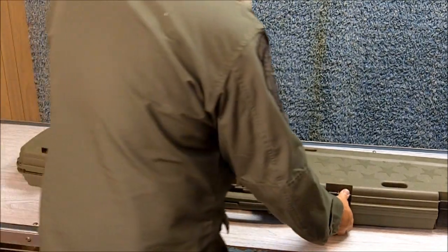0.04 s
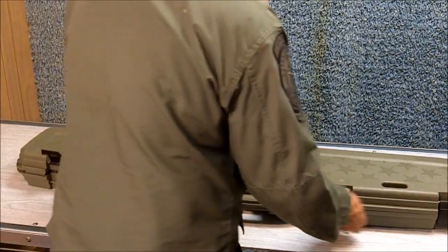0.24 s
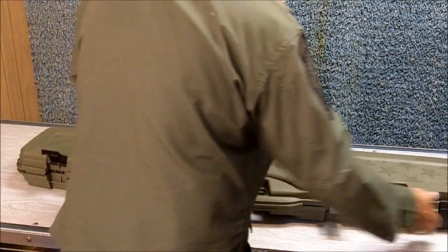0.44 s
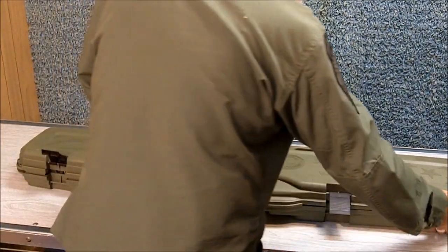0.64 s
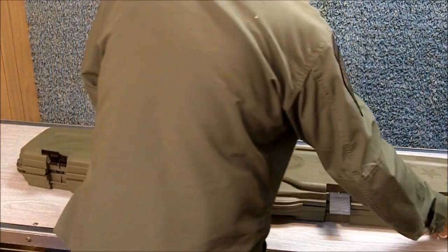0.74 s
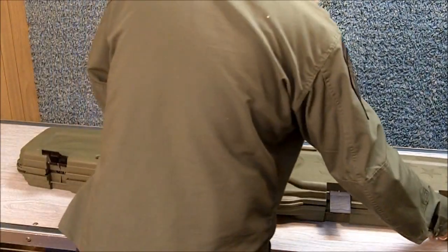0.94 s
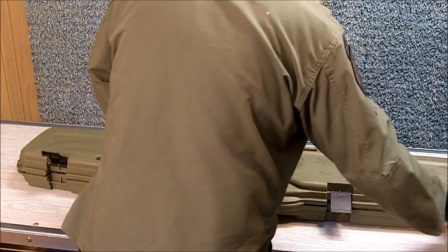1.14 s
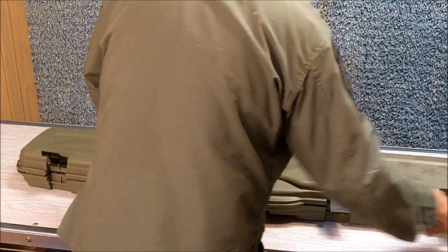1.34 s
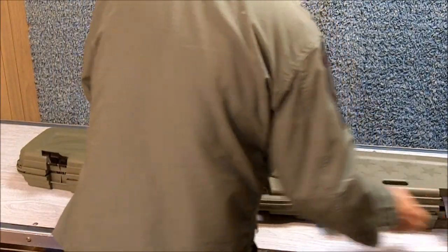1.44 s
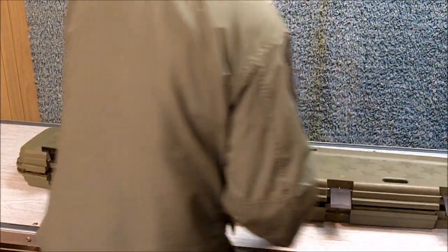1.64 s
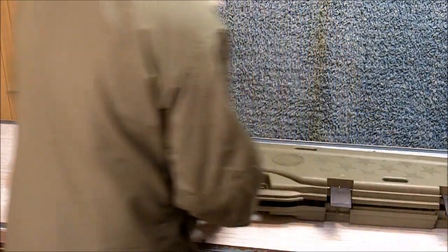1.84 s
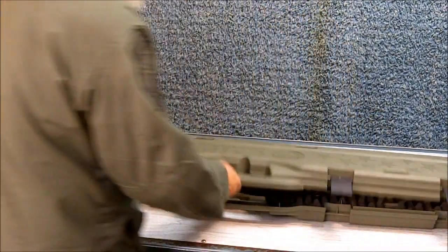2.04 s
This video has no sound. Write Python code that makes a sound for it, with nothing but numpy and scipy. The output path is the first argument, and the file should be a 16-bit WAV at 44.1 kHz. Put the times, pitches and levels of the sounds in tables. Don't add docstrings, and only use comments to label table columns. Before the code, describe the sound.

Close up in a small soft-walled room, a plastic case latch clacks open with a deep hollow knock, then a brighter second one snaps; light hand bumps, ticks and cloth rubbing surround them.

```python
import sys
import numpy as np
from scipy import signal
from scipy.fft import rfft, irfft, next_fast_len
from scipy.io import wavfile
from scipy.ndimage import map_coordinates

SR = 44100
rng = np.random.default_rng(int(sys.argv[2]) if len(sys.argv) > 2 else 0)


def wav_out(sig):
    wavfile.write(sys.argv[1], SR, np.round(np.clip(np.atleast_2d(sig).T, -1, 1) * 32767).astype(np.int16))


def voltage_ratio(decibels):
    exponent = np.asarray(decibels, float) / 20
    return 10 ** exponent


N = 92610
LOW_CUT_HZ = 79


def unit(x):
    return x / np.sqrt(np.mean(x ** 2) + 1e-20)


def along(points, hz):
    f, value = np.transpose(points)
    return np.interp(np.log(hz + 1), np.log(f + 1), value)


def coloured(x, spectrum):
    n = x.shape[-1]
    size = next_fast_len(n + SR // 5)
    gain = voltage_ratio(along(spectrum, np.fft.rfftfreq(size, 1 / SR)))
    return irfft(rfft(x, size) * gain, size)[..., :n]


def noise(count, spectrum):
    return unit(coloured(rng.standard_normal(count), spectrum))


def filtered(x, order, hz, kind):
    return signal.sosfilt(signal.butter(order, hz, kind, fs=SR, output="sos"), x)


def wobble(rate):
    knots = rng.standard_normal(int(N * rate / SR) + 4)
    return map_coordinates(knots, [np.arange(N) * rate / SR])


def dying(sound, t60s):
    hz, t, z = signal.stft(sound, SR, nperseg=256)
    fade = voltage_ratio(-60 * t / along(t60s, hz)[:, None])
    return signal.istft(z * fade, SR, nperseg=256)[1][:len(sound)]


def add(track, s, sound):
    start = round(s * SR)
    sound, part = sound[max(-start, 0):], track[max(start, 0):]
    part[:len(sound)] += sound[:len(part)]


# t/s, ring level/dB, favoured f/Hz, crack level/dB
FIRST_LATCH = [
    (.2096, -13.5, 394, -33),
    (.2118, -18, 880, -27),
    (.2160, -10.5, 208.5, -35.5),
    (.2285, -12.5, 697, -34),
    (.2345, -31.5, 520, -52.5),
]
SECOND_LATCH = [
    (1.1066, -16, 1015, -24),
    (1.1122, -17.5, 344.3, -33.5),
    (1.1172, -15, 642, -21),
    (1.1235, -19, 909, -33),
    (1.137, -22, 620, -38.5),
]
HAND_BUMPS = [(-.02, -24, 380, -77), (.008, -43, 480, -68.5), (.024, -40, 330, -74.5),
              (.14, -51.5, 330, -84), (.045, -41.5, 535, -52), (.052, -41, 596, -52), (.188, -59, 218, -87),
              (.29, -59, 197, -71), (.345, -45.5, 300, -60), (.75, -69.5, 407.4, -80.5),
              (.776, -59.5, 328, -116), (1.294, -43.5, 590, -43.5), (1.606, -47.5, 294, -77.5),
              (1.63, -52, 250, -82), (1.649, -46, 450, -82), (1.685, -40, 475, -45),
              (1.692, -39.5, 320, -45), (1.72, -69, 410, -81), (1.875, -49, 950, -71),
              (1.89, -51, 870, -81), (2.092, -77, 151, -70)]
# f/Hz, level/dB, t60/s
MID_SHELL_MODES = [(205, -2.5, 0.049), (270, -5, .1), (353, 13.5, 0.19), (386, 7, 0.34),
                   (473, -40.5, 0.033), (600, -15.5, 0.17), (646, -8.5, 0.053), (710, -5.5, 0.24),
                   (870, -10, 0.25), (935, -21.5, 0.36), (1150, -8.5, 0.036), (1390, -23.5, 0.027),
                   (1550, -27, 0.076), (2139, 4.5, 0.035)]
END_SHELL_MODES = [(205, -38, 0.087), (250, -14.5, 0.074), (307.6, -1, 0.049), (356.4, -30, 0.39),
                   (532.3, -4, 0.27), (544, -20.5, 0.1), (620, 11.5, 0.025), (650, -10.5, 0.032),
                   (750, -36.5, 0.3), (922, -10.5, 0.038), (1105, -19, 0.052), (1452, -5, 0.033),
                   (1690, -43.5, .1), (2300, -29, 0.082)]
# f/Hz, t60/s
RATTLE_SPECTRUM = [(60, -10.5), (150, -1.5), (400, 1.5), (900, -3), (2000, -12.5), (4000, -26.5),
                   (8000, -37.5), (15000, -56)]
RATTLE_DECAY = [(150, 0.18), (600, 0.13), (2000, 0.16), (5000, 0.13), (12000, 0.064)]
# f/Hz, level/dB
CRACK_SPECTRUM = [(600, -14.5), (1500, 4), (3000, 4), (6000, -6), (10000, -27), (15000, -36)]


def knocks(blows, shell, damping):
    favour_db_per_oct2, mode_scatter_db, lean_limit_db = 6.5, 2.5, -10.5
    longest_ring_s = .16
    rattle_db, rattle_rise_s, blow_rise_s = -2.5, .0011, .00015
    panel_db, panel_cycles, crack_t60 = 1, 16, .009
    out, t = np.zeros(N), np.arange(SR // 2) / SR
    hz, mode_db, t60 = np.transpose(shell)[:, :, None]
    ring_t60 = damping * np.minimum(t60, longest_ring_s)
    polarity = (-1.) ** np.arange(len(shell))[:, None]
    modes = polarity * np.sin(2 * np.pi * hz * t)
    rattle_t60 = [(f, decay * damping) for f, decay in RATTLE_DECAY]

    for s, ring_db, favour_hz, crack_db in blows:
        def weight_db(f):
            return -favour_db_per_oct2 * np.log2(f / favour_hz) ** 2

        start_db = mode_db + weight_db(hz) + mode_scatter_db * rng.standard_normal(hz.shape)
        ring = np.sum(voltage_ratio(start_db - start_db.max() - 60 * t / ring_t60) * modes, axis=0)
        leaning = [(f, db + max(weight_db(f) / 2, lean_limit_db)) for f, db in RATTLE_SPECTRUM]
        rattle = voltage_ratio(rattle_db) * dying(noise(len(t), leaning), rattle_t60)
        rattle = rattle * np.minimum(t / rattle_rise_s, 1)
        panel = voltage_ratio(panel_db - 60 * t * favour_hz / panel_cycles) * np.sin(2 * np.pi * favour_hz * t)
        crack = voltage_ratio(crack_db - 60 * t / crack_t60) * noise(len(t), CRACK_SPECTRUM)
        body = (ring + rattle + panel) * (1 - np.exp(-t / blow_rise_s))
        add(out, s, voltage_ratio(ring_db) * body + crack)
    return out


# t/s, level/dB, f/Hz, t60/s
BOOMS = [(-.0184, -14, 205, 0.1), (-.02, -35.5, 141, 0.29), (0, -49, 70, 0.52), (0.2101, -15.5, 342, 0.026),
         (.229, -26.5, 783, 0.048), (.233, -9.5, 559, 0.03), (1.1175, -6, 626, 0.035),
         (1.606, -34, 230, 0.061), (1.607, -51, 419, .05), (0.2056, -34.5, 150, 0.033),
         (1.1042, -24, 200, 0.027), (0.214, -17, 143.4, 0.27), (0.228, -37, 59.5, 0.22),
         (.28, -54.5, 58, 0.15), (0.378, -49, 59, 0.096), (1.108, -14.5, 140.3, 0.18),
         (1.12, -31, 70, 0.08), (1.201, -48, 174.2, 1.2), (1.195, -41.5, 60, 0.24),
         (1.329, -49, 78.9, 0.076), (1.609, -43, 60, 0.12), (1.693, -45, 62, 0.26), (1.991, -51, 65, 0.2)]


def table_booms():
    out, t = np.zeros(N), np.arange(SR // 2) / SR
    swell = 1 - np.exp(-t / .0015)
    for s, db, hz, t60 in BOOMS:
        add(out, s, voltage_ratio(db - 60 * t / t60) * swell * np.sin(2 * np.pi * hz * t))
    return out


# f/Hz, level/dB per Hz
AIR_SPECTRUM = [(12, -7.5), (25, 6.5), (50, -7.5), (130, -12), (330, -19), (800, -29.5), (2500, -30.5),
                (8000, -37), (15000, -39)]


def room_tone():
    level_db, swing_db = -58.5, .7
    return voltage_ratio(level_db + swing_db * wobble(7.8)) * noise(N, AIR_SPECTRUM)


# t/s, rubbing level/dB
ARM_MOVES = [(0, -55.5), (0.151, -61), (.5, -66), (0.691, -71.5), (0.708, -61), (0.791, -61), (.82, -69),
             (0.899, -62), (0.998, -69), (1.3, -65), (1.58, -73), (1.749, -55.5), (1.8, -63), (1.897, -54),
             (1.95, -62), (2.1, -64.5)]
# f/Hz, level/dB
CLOTH_SPECTRUM = [(100, -6.5), (250, -0.5), (700, -3.5), (1500, -12.5), (2600, -17), (5000, -26.5),
                  (10000, -36.5)]


def sleeve():
    s, db = np.transpose(ARM_MOVES)
    grain = voltage_ratio(.5 * (wobble(27) + wobble(450)))
    rubbing = unit(grain * coloured(rng.standard_normal(N), CLOTH_SPECTRUM))
    return voltage_ratio(np.interp(np.arange(N) / SR, s, db)) * rubbing


# f/Hz, t60/s
ROOM_DECAY = [(120, 0.5), (600, 0.44), (2000, 0.35), (6000, 0.15), (12000, 0.086)]


def room(x):
    level_db, delay_s = -17.5, .01
    tail = dying(rng.standard_normal(SR // 2), ROOM_DECAY)
    scattered = filtered(x * unit(wobble(170)), 2, LOW_CUT_HZ, "high")
    late = np.pad(scattered, (round(delay_s * SR), 0))
    return voltage_ratio(level_db) * signal.fftconvolve(late, tail / np.linalg.norm(tail))[:N]


# t/s, level/dB, f/Hz, t60/s
QUICK_RINGS = [(.0362, -52.5, 2100, .012), (.0446, -35.5, 2950, 0.014), (.0448, -40, 2300, .012),
               (.045, -47.5, 6750, .012), (.051, -49, 2222, 0.013), (.054, -53, 2880, 0.017),
               (.0605, -50, 2722, .018), (.069, -57.5, 2577, .015), (.2122, -11.5, 2110, .016),
               (.2105, -44, 6930, .01), (0.2099, -7, 1050, 0.011), (0.2124, -7.5, 350, .05),
               (0.2307, -19, 351, 0.043), (0.189, -32, 234, 0.11), (0.1827, -51, 1180, .03),
               (0.046, -47, 1700, .008), (.2284, -18.5, 2700, 0.0098), (.2286, -20.5, 2250, 0.01),
               (.2288, -27, 3600, 0.01), (.229, -34, 5285, .01), (.245, -35.5, 2200, 0.016),
               (.3395, -51, 2780, .015), (.64, -42, 1850, 0.0091), (1.1066, -2.5, 846, 0.0038),
               (1.1064, -19, 3467, 0.0038), (1.1066, -33.5, 7830, 0.005), (1.1066, -37.5, 10800, 0.0055),
               (1.1066, -44, 13600, .005), (1.1165, -36.5, 4350, 0.0082), (1.117, -41, 7400, 0.0066),
               (1.106, -9, 310, 0.038), (1.119, -30, 2300, 0.026), (1.1205, -28.5, 2917, 0.013),
               (1.1245, -41, 6000, 0.0045), (1.1282, -35.5, 6090, .008), (1.1368, -38, 6000, 0.0081),
               (1.137, -31, 3330, 0.0092), (0.6391, -48, 950, 0.0097), (.64, -53, 2500, 0.0089),
               (1.6058, -53, 740, .012), (0.887, -53.5, 1350, .015), (1.8742, -37.5, 950, 0.021),
               (1.8737, -45, 1400, 0.01), (1.875, -50, 2200, .008)]


def pings():
    rise_cycles = .5
    out, t = np.zeros(N), np.arange(SR // 20) / SR
    for s, db, hz, t60 in QUICK_RINGS:
        rise = 1 - np.exp(-t * hz / rise_cycles)
        add(out, s, voltage_ratio(db - 60 * t / t60) * rise * np.sin(2 * np.pi * hz * t))
    return out


# t/s, level/dB, f/Hz
LOOSE_TICKS = [(0.0426, -42, 4370), (0.183, -50, 1180), (0.2109, -12, 916), (0.2825, -38, 4170),
               (.293, -36.5, 4600), (0.303, -37.5, 3280), (0.3395, -43.5, 4300), (0.64, -45.5, 1290),
               (.8885, -47, 1800), (1.136, -28.5, 770), (1.292, -60, 1280), (1.294, -58, 3900),
               (1.3141, -46.5, 2960), (1.317, -48, 2300), (1.6831, -46.5, 3500), (1.6884, -35, 3560),
               (1.69, -34, 6840)]


def ticks():
    width_oct, puff_db, puff_t60 = .41, -7, .012
    die_cycles, rise_cycles = 13, .25
    out, t = np.zeros(N), np.arange(SR // 20) / SR
    for s, db, hz in LOOSE_TICKS:
        band = [(hz * 2 ** (-2 * width_oct), -30), (hz * 2 ** (-width_oct / 2), -6), (hz, 0),
                (hz * 2 ** width_oct, -8), (hz * 4 ** width_oct, -26)]
        puff = voltage_ratio(puff_db - 60 * t / puff_t60) * noise(len(t), band)
        partials = np.sin(2 * np.pi * .8 * hz * t) + voltage_ratio(-5) * np.sin(2 * np.pi * 1.4 * hz * t)
        ping = voltage_ratio(-60 * t * hz / die_cycles) * partials
        add(out, s, voltage_ratio(db) * (puff - ping) * (1 - np.exp(-t * hz / rise_cycles)))
    return out


# t/s, level/dB, t60/s
SCRAPE_BURSTS = [
    (0.0452, -60, .012),
    (0.2113, -48, 0.037),
    (.217, -46.5, .012),
    (.2283, -56, .02),
    (1.1072, -47, .02),
    (1.111, -50.5, 0.043),
    (1.1164, -49.5, 0.052),
    (1.6844, -55.5, .03),
    (1.6888, -64.5, 0.027),
    (1.8748, -68, .01),
]
# f/Hz, level/dB
SCRAPE_SPECTRUM = [(2500, -29), (5000, 0.5), (8000, -3.5), (12000, -3), (15000, -2.5)]


def scrapes():
    out, t = np.zeros(N), np.arange(SR // 10) / SR
    for s, db, t60 in SCRAPE_BURSTS:
        add(out, s, voltage_ratio(db - 60 * t / t60) * noise(len(t), SCRAPE_SPECTRUM))
    return out


def scene():
    case = knocks(FIRST_LATCH, MID_SHELL_MODES, .56) + knocks(SECOND_LATCH, END_SHELL_MODES, .7)
    case += knocks(HAND_BUMPS, MID_SHELL_MODES, .55)
    near = filtered(case + ticks(), 1, [LOW_CUT_HZ, 6000], "band") + scrapes()
    booms = filtered(table_booms(), 2, 21, "high") + pings()
    direct = near + booms
    return np.tile(direct + room(direct) + sleeve() + room_tone(), (2, 1))


def overload(x):
    ceiling, knee = .5, 12
    return x / (1 + np.abs(x / ceiling) ** knee) ** (1 / knee)


def channel_skew(x):
    return voltage_ratio(-24) * filtered(x, 4, 1800, "high") * [[1], [-1]]


# f/Hz, level/dB per Hz
HISS_SPECTRUM = [(12, -6), (30, -6.5), (100, -12), (400, -23), (2000, -26), (9000, -30.5), (12500, -32.5),
                 (14500, -37.5)]


def channel_hiss(shape):
    return voltage_ratio(-70) * unit(coloured(rng.standard_normal(shape), HISS_SPECTRUM))


def low_pass(x):
    return signal.sosfilt(signal.butter(12, 15290, fs=SR, output="sos"), x)


CHANNEL_OFFSET = [
    [.0193],
    [.0069],
]


def record(dry):
    clipped = overload(dry)
    channels = clipped + channel_skew(clipped) + channel_hiss(dry.shape)
    band = coloured(channels, [(15300, 0), (15400, -60)])
    return low_pass(band + np.array(CHANNEL_OFFSET))


dry = scene()
out = record(dry)
wav_out(out)
```